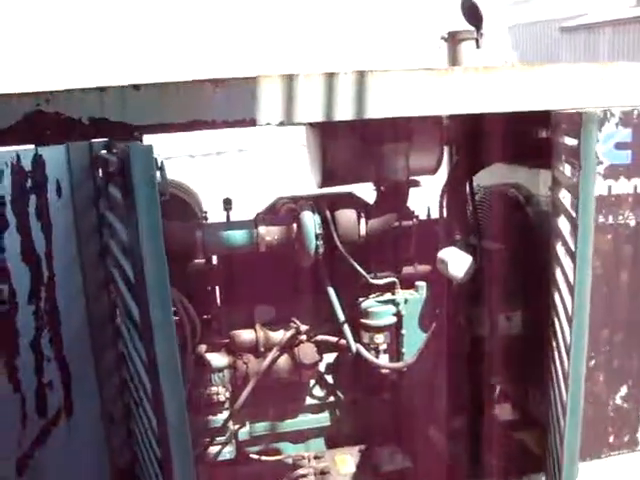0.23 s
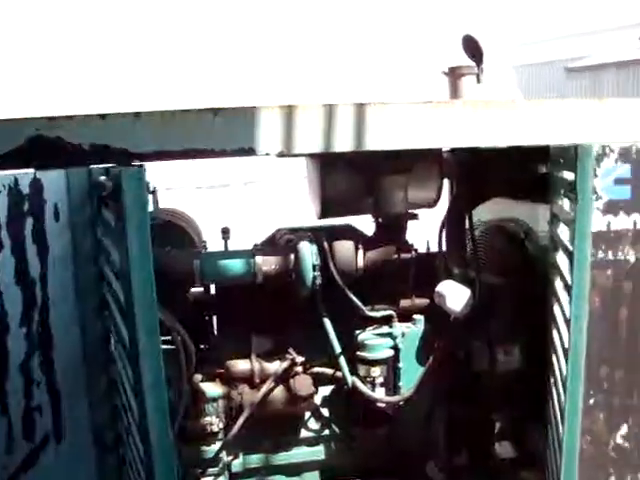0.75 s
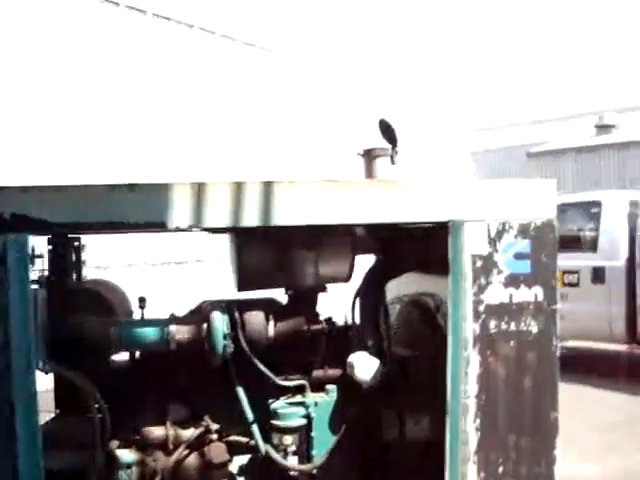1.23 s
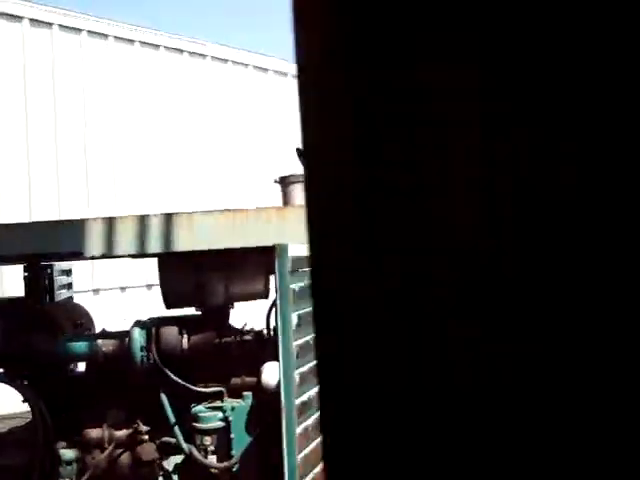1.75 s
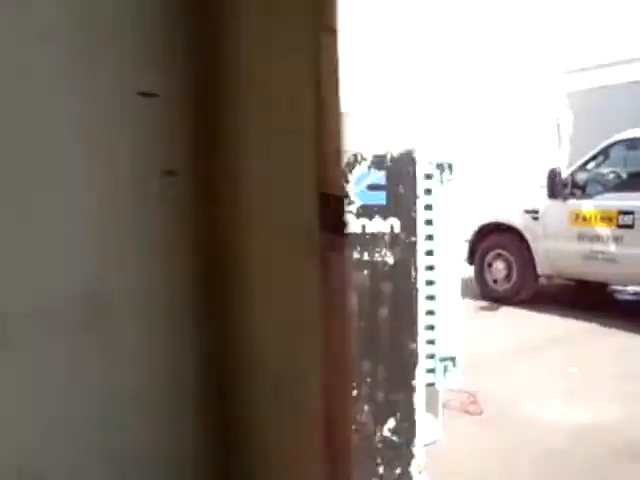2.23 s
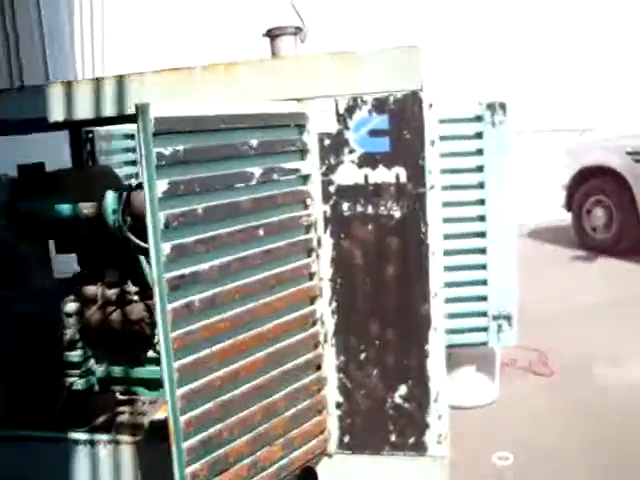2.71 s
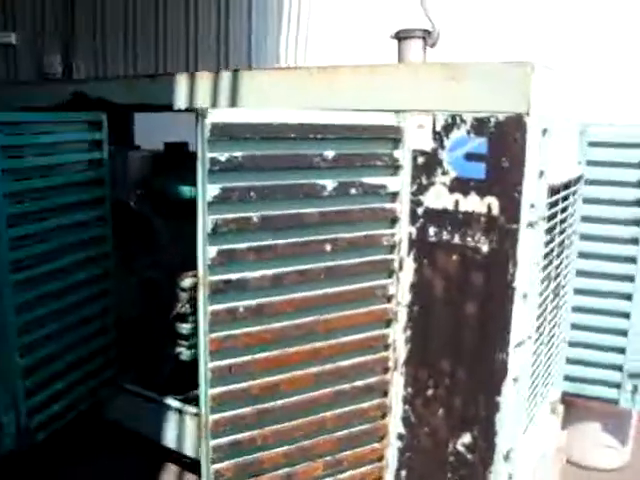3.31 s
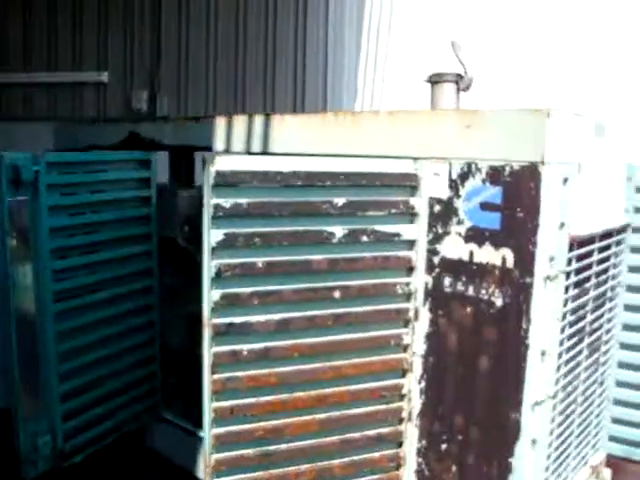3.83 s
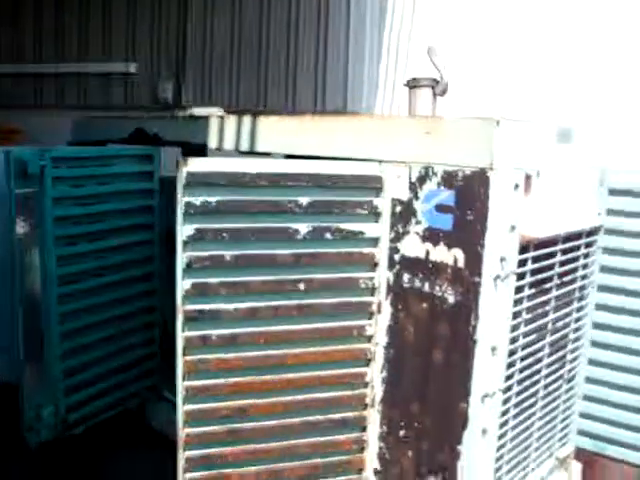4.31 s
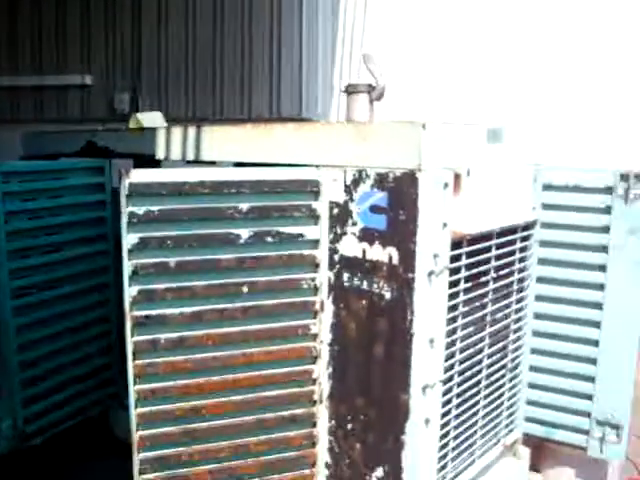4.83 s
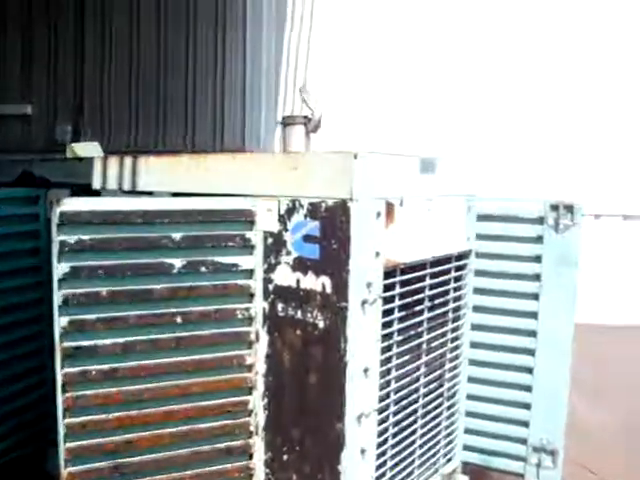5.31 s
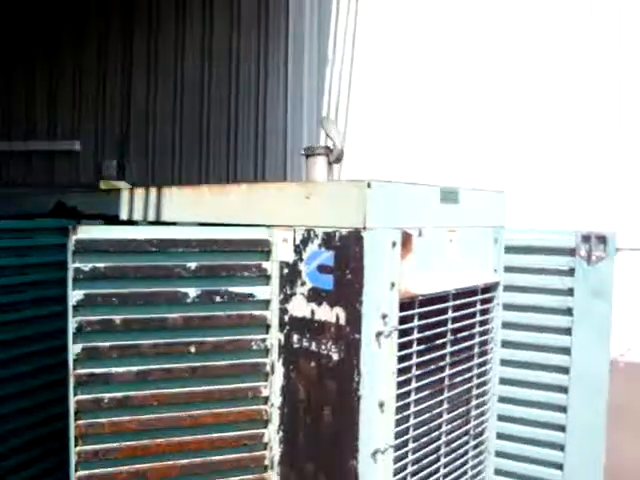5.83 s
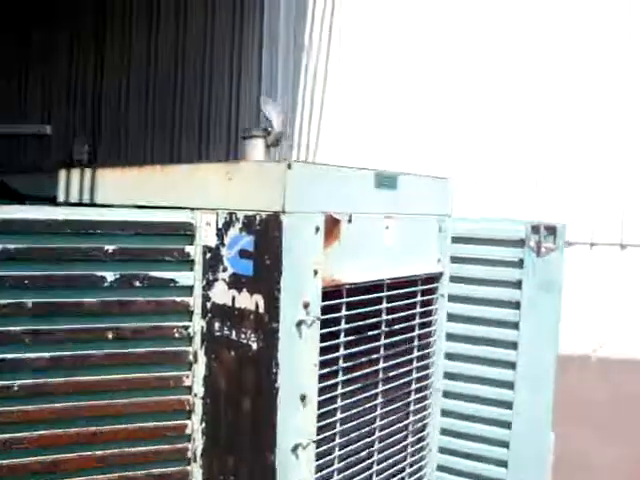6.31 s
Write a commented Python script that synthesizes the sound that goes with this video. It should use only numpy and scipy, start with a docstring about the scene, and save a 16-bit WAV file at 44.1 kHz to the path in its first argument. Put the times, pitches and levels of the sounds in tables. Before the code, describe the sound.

A big diesel generator runs at constant speed in a louvred steel enclosure outdoors. Fast, blurred clatter, broad fan rush and bright air hiss form a dense roar over a weaker low drone. The close handheld microphone moves from the open engine bay past a steel door, where a hollow whoosh rises in pitch and low boom swells, then along the louvres to the radiator, with wavering fan tones and thin gear whine.

```python
"""Yard, louvred steel enclosure: a six-cylinder diesel generator governed at 1800 rpm.
The microphone walks from the open engine bay, close past a steel door, towards the radiator.
Crank-locked sines make the drone, boom, fan tones, gear whine and panel tones; repeating noise bursts
make the block clatter; shaped noise makes fan rush and air hiss. A shrinking echo delay sweeps a
hollow notch up past the door, and a rising howl rings in the gap behind it."""
import sys
import numpy as np
from scipy import signal
from scipy.fft import rfft, irfft, next_fast_len
from scipy.io import wavfile
from scipy.ndimage import uniform_filter1d, map_coordinates

SR = 44100
rng = np.random.default_rng(int(sys.argv[2]) if len(sys.argv) > 2 else 0)


def store_wav(level_fs):
    """Save 16-bit WAV to argv[1]."""
    pcm = np.round(np.clip(np.atleast_2d(level_fs), -1, 1) * 32767)
    wavfile.write(sys.argv[1], SR, pcm.T.astype(np.int16))


N = 289296
TIME_S = np.arange(N) / SR
CYCLE_HZ = 14.997  # one engine cycle = two crank turns


def crank(hunt):
    """Engine cycles elapsed; the governor holds the speed to within a tiny share."""
    return np.cumsum(CYCLE_HZ * (1 + hunt * wobble(3))) / SR


def engine(cycles):
    """Three radiators of one engine: firing drone, housing boom, block clatter."""
    return firing_drone(cycles) + housing_boom(cycles) + block_clatter(cycles)


# exhaust and housing lines: (multiple of engine cycle [-], level [dB])
DRONE_LINES = [(6, 0.5), (8, -12), (9, -10), (10, -20.5), (11, -10)]
# drone level: (at bay [dB], at radiator [dB], added at door [dB], added along side [dB])
DRONE_WALK = (-55, -61, 5.5, -.3)


def firing_drone(cycles):
    """Firing pulses repeat with the cycle, so their energy sits on its multiples."""
    return amp(along_walk(*DRONE_WALK)) * lines(cycles, DRONE_LINES, fade_db=.3, drift=.12, rate=2)


# housing lines: (multiple of engine cycle [-], level [dB])
BOOM_LINES = [(12, -3), (14, -12.5), (15, -7), (16, -5.5), (18, -11.5), (20, -11), (21, -12), (24, -5)]
# enclosed air, noise spectrum: (frequency [Hz], level [dB per Hz])
CAVITY_SPECTRUM = [(70, -36.5), (130, -27), (190, 7), (230, 4.5), (290, -11), (450, -23), (1000, -52)]
# boom level: (at bay [dB], at radiator [dB], added at door [dB], added along side [dB])
BOOM_WALK = (-47, -54, 7.5, 0.1)
HOUSING_HZ = 206.2


def housing_boom(cycles):
    """Housing harmonics, one housing hum and noise in a low cavity band."""
    walls = lines(cycles, BOOM_LINES, fade_db=1.8, drift=.5, rate=2)
    hum = amp(-1.5) * lines(cycles * HOUSING_HZ / CYCLE_HZ, [(1, 0)], fade_db=1.5, drift=.3, rate=1.8)
    cavity = amp(-5.0) * noise(CAVITY_SPECTRUM)
    return amp(along_walk(*BOOM_WALK)) * (walls + hum + cavity)


# ringing block: (multiple of engine cycle [-], level [dB])
BLOCK_LINES = [(34, -24.5), (50, -23.5), (52, -33), (73, -23.5), (74, -24), (79, -32), (84, -20.5),
               (88, -19.5), (92, -28), (112, -24.5), (150, -26)]
# rattle spectrum: (frequency [Hz], level [dB per Hz])
CLATTER_SPECTRUM = [(200, -43.5), (400, -7.5), (700, -8), (1000, -1), (1350, 0.5), (1550, -2), (1780, -4),
                    (2400, -3.5), (3000, -7.5), (4000, -14.5), (6000, -17.5), (10000, -29)]
# clatter level: (at bay [dB], at radiator [dB], added at door [dB], added along side [dB])
CLATTER_WALK = (-21, -21, -0.1, 3)


def block_clatter(cycles):
    """Firings rattle the block, which also rings at its harmonics."""
    rattle = knocks(cycles, repeat=0.53, spots_per_s=2.497, decay_s=0.0055, ring_floor=3.1)
    ring = lines(cycles, BLOCK_LINES, fade_db=4.5, drift=1.65, rate=2.525)
    waver_db = 0.46 * wobble(70)  # the clatter's level wavers slightly at random
    clatter = patchy(coloured(rattle, CLATTER_SPECTRUM), patchy_db=1.4) + amp(3.0) * ring
    return amp(along_walk(*CLATTER_WALK) + waver_db) * clatter


# strength of each firing in turn: (level [dB])
CYLINDERS_DB = [1.1, -0.29, 1.2, -1, 0.89, -0.66]


def knocks(cycles, repeat, spots_per_s, decay_s, ring_floor):
    """Decaying firing bursts; part of the rattle repeats each cycle, its pattern changing spot to spot."""
    size, count = round(SR / CYCLE_HZ), len(CYLINDERS_DB)
    patterns = rng.standard_normal((64, size))
    spot, between = np.divmod(TIME_S * spots_per_s, 1)
    spot, place = spot.astype(int), (cycles % 1 * size).astype(int)
    # equal-power crossfade between spots
    leaving = np.cos(between * np.pi / 2) * patterns[spot, place]
    entering = np.sin(between * np.pi / 2) * patterns[spot + 1, place]
    share = np.clip(repeat, 0, 1)
    rattle = np.sqrt(share) * (leaving + entering) + np.sqrt(1 - share) * rng.standard_normal(N)
    firing, age = np.divmod(cycles * count, 1)
    strength = amp(CYLINDERS_DB)[firing.astype(int) % count]
    age_s = age / (count * CYCLE_HZ)
    return rattle * (ring_floor + strength * np.exp(-age_s / decay_s))


# tone beams at 2, 3, 4, 5 x blade rate: (start [s], length [s], rise [dB])
HUM_BEAMS = [(1.3, 1.3, 6.5), (2.7, 0.36, 9.5), (3.05, 1.87, 4)]
THIRD_BEAMS = [(3.27, 2.3, 6.2)]
FOURTH_BEAMS = [(1.95, .35, 10.5), (2.85, .9, 8.6), (5.1, 1.6, 8.1)]
FIFTH_BEAMS = [(2.0, 1.25, 10.8), (3.25, .6, 6), (6.25, .5, 10)]
# weak tones that follow the rush: (multiple of blade rate [-], level [dB])
FAN_WEAK_LINES = [(1, -28.5), (6, -11.5)]
# rushing air: (frequency [Hz], level [dB per Hz])
RUSH_SPECTRUM = [(20, -41.5), (75, -41.5), (110, -24.5), (170, -19.5), (260, -13), (340, -5), (450, -5.5),
                 (560, -1), (800, 3.5), (1300, -5.5), (1800, -9), (4000, -27.5), (10000, -46.5)]
# rush level: (at bay [dB], at radiator [dB], added at door [dB], added along side [dB])
RUSH_WALK = (-24, -24, -0.3, -0.2)
BLADE_HZ = 197.4
# levels where the enclosure screens the tones
HUM_DB, THIRD_DB, FOURTH_DB, FIFTH_DB = -40.5, -43.5, -40, -41.5


def fan(cycles):
    """Radiator fan: blade tones made unsteady by its own rushing air."""
    blades = cycles * BLADE_HZ / CYCLE_HZ
    tones = beaming(HUM_DB, HUM_BEAMS) * lines(blades, [(2, 0)], fade_db=2.7, drift=.25, rate=8)
    upper = (3, THIRD_DB, THIRD_BEAMS), (4, FOURTH_DB, FOURTH_BEAMS), (5, FIFTH_DB, FIFTH_BEAMS)
    for order, screened_db, beams in upper:
        tone = lines(blades, [(order, 0)], fade_db=2.5, drift=.75, rate=15)
        tones += beaming(screened_db, beams) * tone
    weak = lines(blades, FAN_WEAK_LINES, fade_db=3.5, drift=0.79, rate=8)
    rush = patchy(noise(RUSH_SPECTRUM), patchy_db=1.3) + weak
    return tones + amp(along_walk(*RUSH_WALK)) * rush


# intake air: (frequency [Hz], level [dB per Hz])
HISS_SPECTRUM = [(800, -30.5), (2000, -1), (3000, 3), (4200, 2), (5000, 0), (6100, 0), (7000, -3.5),
                 (8500, -5), (10000, -11.5)]
# intake level: (at bay [dB], at radiator [dB], added at door [dB], added along side [dB])
HISS_WALK = (-23, -23.5, 0, -3.5)
# door across the line of sight: (start [s], attack [s], hold [s], release [s])
DOOR_SHADOW = (1.6, .35, .3, .2)
# air through the radiator core: (frequency [Hz], level [dB per Hz])
CORE_SPECTRUM = [(3000, -28), (4600, -7), (5700, -2), (6500, -6), (9000, -26)]
SHADOW_DB = -1
CORE_DB, CORE_START_S, CORE_RISE_S = -35, 5.4, .2


def hiss():
    """Intake air, a plain steady hiss, door-shaded; core air, heard once the grille is in view."""
    unevenness_db = 0.41 * wobble(25) + 1.1 * wobble(150)  # small random level change
    shade_db = SHADOW_DB * swell(*DOOR_SHADOW)
    intake_gain = amp(along_walk(*HISS_WALK) + shade_db + unevenness_db)
    intake = intake_gain * patchy(noise(HISS_SPECTRUM), patchy_db=1.0)
    in_view = np.clip((TIME_S - CORE_START_S) / CORE_RISE_S, 0, 1)
    return intake + amp(CORE_DB) * in_view * noise(CORE_SPECTRUM)


# howl envelope: (start [s], attack [s], hold [s], release [s])
GAP_HOWL = (.92, .2, .62, .18)
# gap modes: (ratio to lowest [-], width [Hz], level [dB])
GAP_MODES = [(1, 109, -0.5), (1.56, 199, -6)]
GAP_DB, GAP_START_HZ, GAP_RISE_HZ_PER_S = -28, 996, 360


def door_gap():
    """The roar rings in the gap behind the door, rising in pitch as the gap narrows."""
    pitch_hz = GAP_START_HZ + GAP_RISE_HZ_PER_S * (TIME_S - GAP_HOWL[0])
    phase = 2 * np.pi * np.cumsum(pitch_hz) / SR
    howl = np.zeros(N)
    for ratio, width_hz, db in GAP_MODES:
        surge = filtered(rng.standard_normal(N), lambda hz: 1 / (1 + (hz / width_hz) ** 2) ** 2)
        howl += amp(db) * unit(surge * np.sin(ratio * phase + 2 * wobble(60)))
    return amp(GAP_DB) * swell(*GAP_HOWL) * howl


# gear tone beams: (start [s], length [s], rise [dB])
WHINE_BEAMS = [(1.38, 1, 6.4), (2.68, 1.95, 7.9), (5.52, 0.21, 6)]
GEAR_HZ, WHINE_DB = 1533.3, -38  # level where screened


def gears(cycles):
    """Gear train: a thin whine at a fixed ratio to the crank."""
    whine = lines(cycles * GEAR_HZ / CYCLE_HZ, [(1, 0)], fade_db=2.0, drift=0.96, rate=10)
    return beaming(WHINE_DB, WHINE_BEAMS) * whine


# wall level: (at bay [dB], at radiator [dB], added at door [dB], added along side [dB])
WALL_WALK = (-43, -44.5, -13, -1)
# panel tone beams: (start [s], length [s], rise [dB])
LOW_PANEL_BEAMS = [(1.1, 0.72, 11)]
HIGH_PANEL_BEAMS = [(0, 1.25, 8.7)]
WALL_ORDER, LOW_PANEL_ORDER, HIGH_PANEL_ORDER = 22, 75, 96  # multiples of engine cycle
LOW_PANEL_DB, HIGH_PANEL_DB = -46.5, -42  # where screened


def panels(cycles):
    """A wall and two steel panels sing at the engine harmonic nearest their resonance."""
    def sing(order):
        return lines(cycles, [(order, 0)], fade_db=4, drift=0.83, rate=7)

    wall_tone = lines(cycles, [(WALL_ORDER, 0)], fade_db=0.5, drift=.4, rate=2.98)
    wall = amp(along_walk(*WALL_WALK)) * wall_tone
    low = beaming(LOW_PANEL_DB, LOW_PANEL_BEAMS) * sing(LOW_PANEL_ORDER)
    high = beaming(HIGH_PANEL_DB, HIGH_PANEL_BEAMS) * sing(HIGH_PANEL_ORDER)
    return wall + low + high


# echo envelope: (start [s], attack [s], hold [s], release [s])
DOOR_ECHO = (.2, 1.15, .47, .12)
DOOR_PATH_M, DOOR_NEARS_M_PER_S = .375, .086  # extra echo path at 0 s, and its shrinkage
DOOR_SHARE = .6  # peak echo feed, before filtering, per direct sound
SOUND_SPEED_M_PER_S = 343


def past_door(x, blur_hz, bend_hz):
    """The door's echo comes ever sooner as it nears, sweeping a hollow notch upward."""
    path_m = DOOR_PATH_M - DOOR_NEARS_M_PER_S * TIME_S
    share = DOOR_SHARE * swell(*DOOR_ECHO)

    def reflection(hz):
        # bass bends round the door; its louvres scatter the treble
        return hz ** 4 / (hz ** 4 + bend_hz ** 4) / (1 + (hz / blur_hz) ** 4)

    delay = path_m / SOUND_SPEED_M_PER_S * SR
    echo = np.interp(np.arange(N) - delay, np.arange(N), filtered(x, reflection))
    return (x + share * echo) / np.sqrt(1 + share ** 2 / 2)


def patchy(x, patchy_db, size=(5, 50)):
    """Shifting reflections between steel walls lift and sink patches (bins, frames) of the spectrum."""
    z = signal.stft(x, nperseg=1024)[2]
    field = uniform_filter1d(rng.standard_normal(z.shape), size[0], 0)
    field = uniform_filter1d(field, size[1], 1)
    return signal.istft(z * amp(patchy_db * unit(field)), nperseg=1024)[1][:N]


# microphone close to the door, then the louvred side: (time [s], half-width [s])
DOOR_PASS = (2.28, .26)
SIDE_PASS = (2.6, .95)
# turn from side to radiator end: (halfway [s], spread [s])
TURN = (4.15, .7)


def along_walk(bay_db, radiator_db, door_db, side_db):
    """Level in dB: glides from bay to radiator, swelled or shaded by door and side."""
    def near(when_s, width_s):
        return np.exp(-((TIME_S - when_s) / width_s) ** 2)

    turned = .5 + .5 * np.tanh((TIME_S - TURN[0]) / TURN[1])
    glide_db = bay_db + (radiator_db - bay_db) * turned
    return glide_db + door_db * near(*DOOR_PASS) + side_db * near(*SIDE_PASS)


BEAM_EDGE_S = .16  # time to cross a beam's edge


def beaming(screened_db, beams):
    """A tone's gain: it rises while the microphone is in one of its beams."""
    rise_db = 0
    for start, length, db in beams:
        hold = max(length - BEAM_EDGE_S, 0)
        rise_db = rise_db + db * swell(start - BEAM_EDGE_S / 2, BEAM_EDGE_S, hold, BEAM_EDGE_S)
    return amp(screened_db + rise_db)


def swell(start, attack, hold, release):
    """An envelope that rises to 1, holds and falls; times in s."""
    return np.interp(TIME_S, np.cumsum([start, attack, hold, release]), [0, 1, 1, 0])


def lines(turns, orders, fade_db, drift, rate):
    """Harmonics of a rotation; each swells and shifts on its own as the sound paths change."""
    out = np.zeros(N)
    for order, db in orders:
        phase = 2 * np.pi * (round(order) * turns + rng.random()) + drift * wobble(rate)
        out += amp(db) * unit(amp(fade_db * wobble(rate)) * np.sin(phase))
    return out


def noise(spectrum):
    """Turbulence with the given spectrum."""
    return coloured(rng.standard_normal(N), spectrum)


def coloured(x, spectrum):
    """x shaped by (Hz, dB) points on a log axis, at rms 1."""
    f, db = np.transpose(spectrum)
    return unit(filtered(x, lambda hz: amp(np.interp(np.log(hz + 1), np.log(f), db))))


def filtered(x, response):
    """x times a response of frequency."""
    m = next_fast_len(N + SR // 2)
    return irfft(rfft(x, m) * response(np.fft.rfftfreq(m, 1 / SR)), m)[:N]


def wobble(rate):
    """A smooth random curve, rate knots a second."""
    knots = rng.standard_normal(512)
    return map_coordinates(knots, [np.arange(N) * rate / SR], mode="mirror")


def amp(db):
    """Decibels to gain."""
    return 10 ** (np.asarray(db) / 20)


def unit(x):
    """Scale to rms 1."""
    return x / np.sqrt(np.mean(x ** 2) + 1e-20)


def scene():
    """One crank drives every rotating source; a single microphone feeds both channels."""
    cycles = crank(hunt=.0004)
    roar = past_door(engine(cycles) + fan(cycles) + hiss(), blur_hz=1080, bend_hz=480)
    machine = roar + door_gap() + gears(cycles) + panels(cycles)
    return np.array([machine, machine])


TOP_HZ = 10150


def record(dry):
    """Band limit: each channel keeps only what lies below TOP_HZ."""
    return np.array([filtered(channel, lambda hz: hz < TOP_HZ) for channel in dry])


dry = scene()
out = record(dry)
store_wav(out)
```